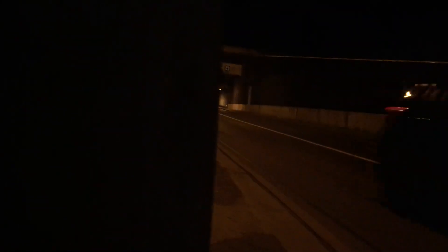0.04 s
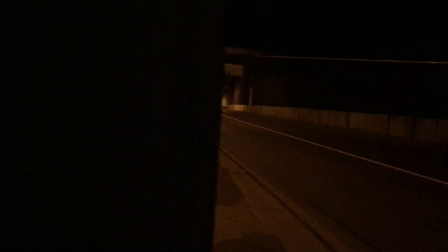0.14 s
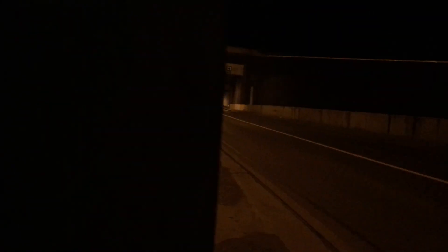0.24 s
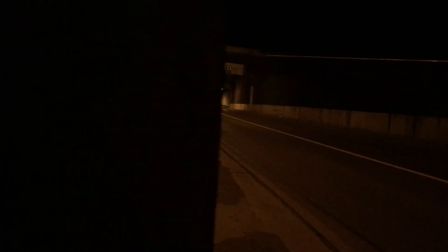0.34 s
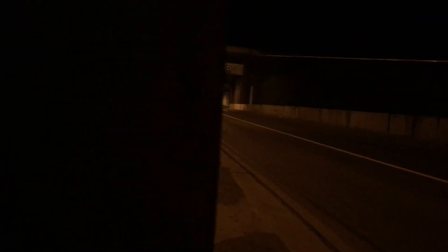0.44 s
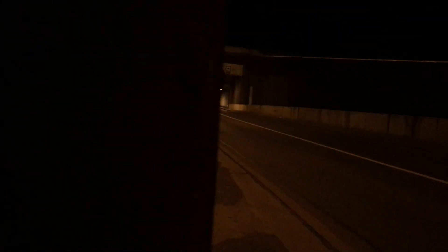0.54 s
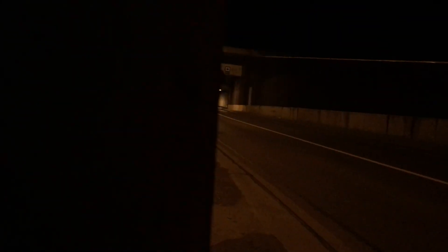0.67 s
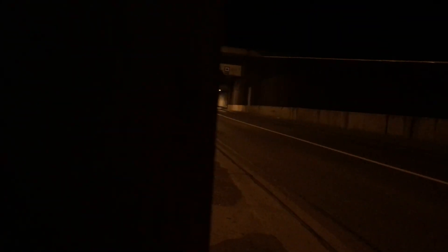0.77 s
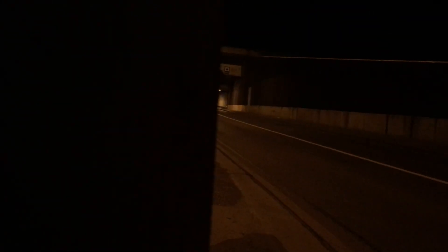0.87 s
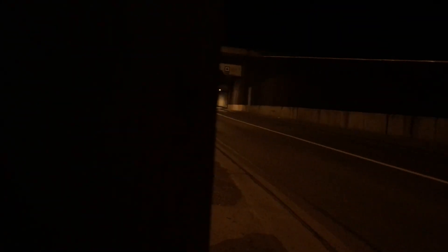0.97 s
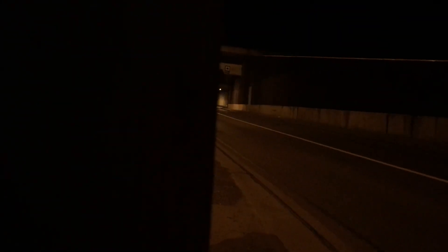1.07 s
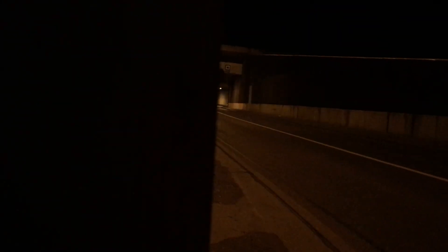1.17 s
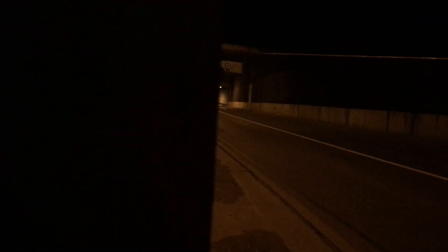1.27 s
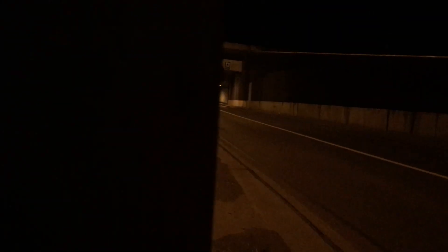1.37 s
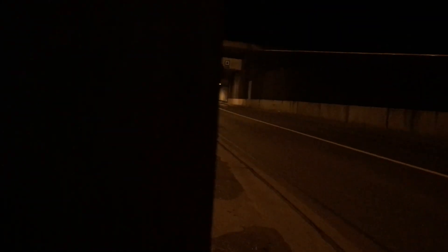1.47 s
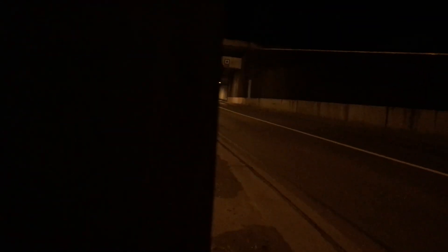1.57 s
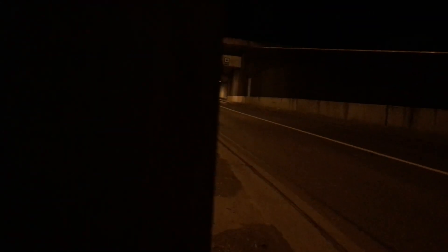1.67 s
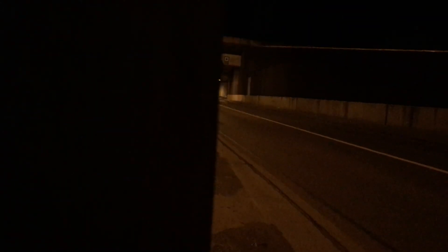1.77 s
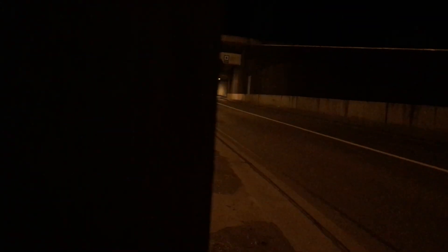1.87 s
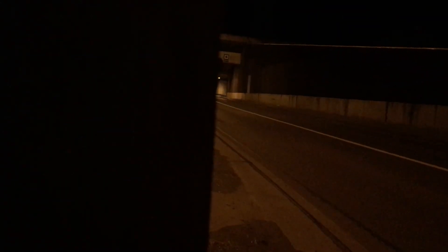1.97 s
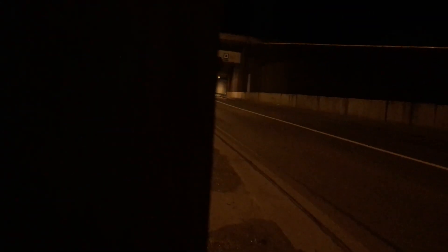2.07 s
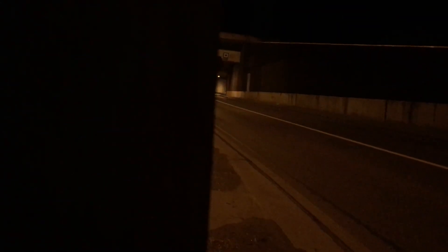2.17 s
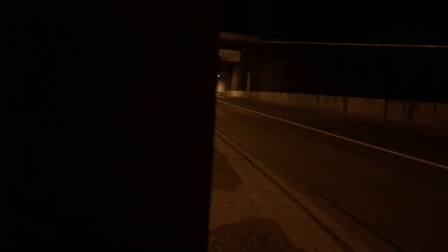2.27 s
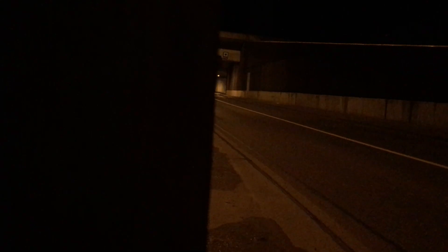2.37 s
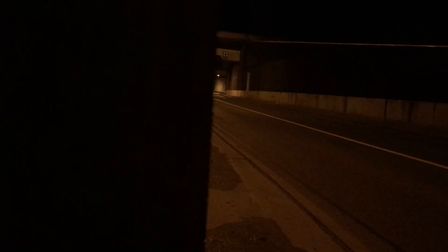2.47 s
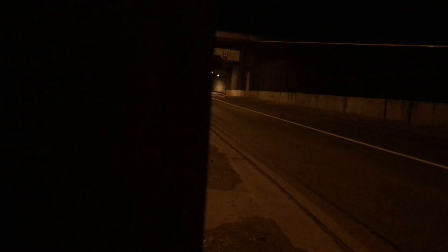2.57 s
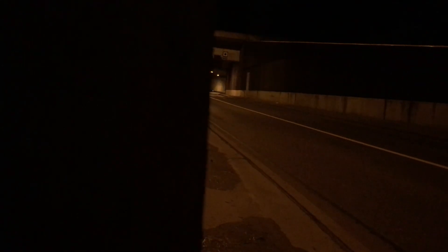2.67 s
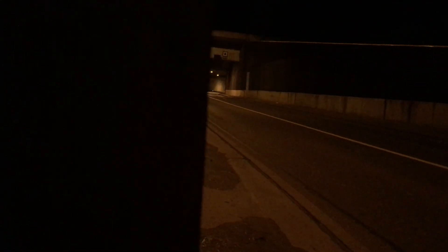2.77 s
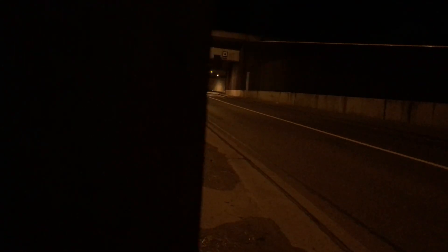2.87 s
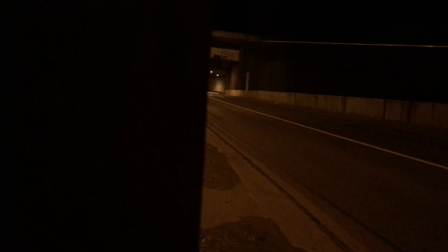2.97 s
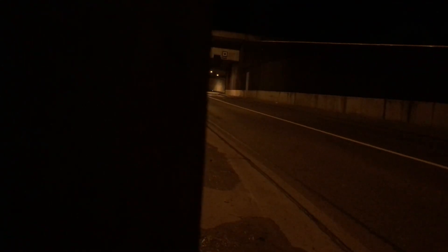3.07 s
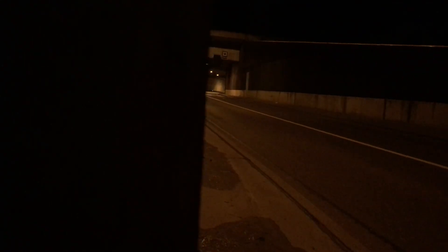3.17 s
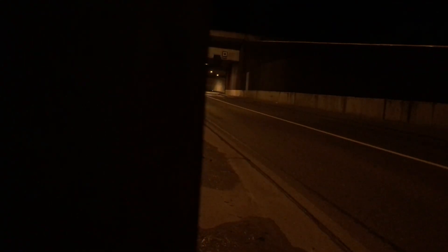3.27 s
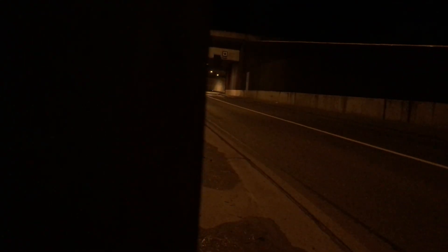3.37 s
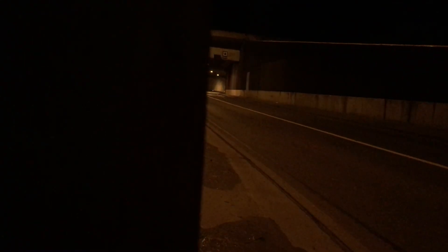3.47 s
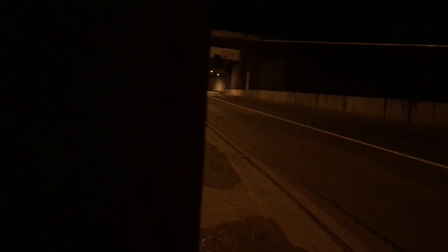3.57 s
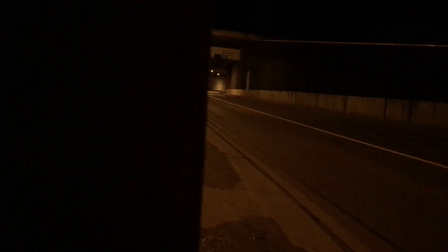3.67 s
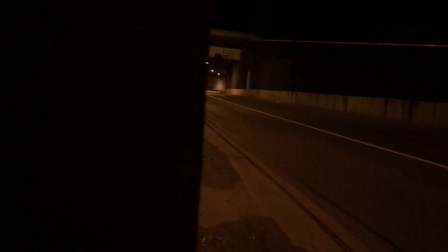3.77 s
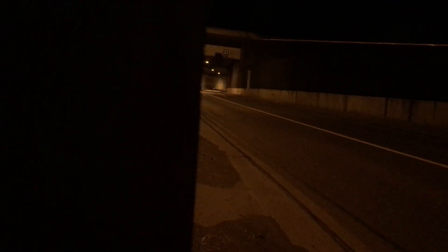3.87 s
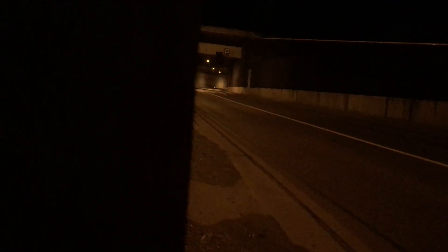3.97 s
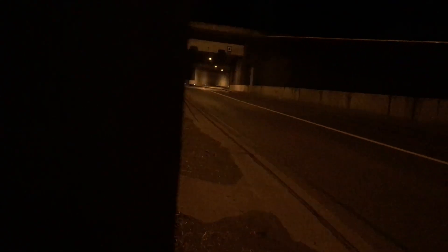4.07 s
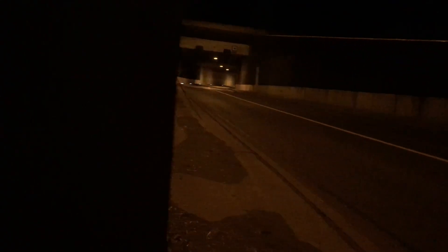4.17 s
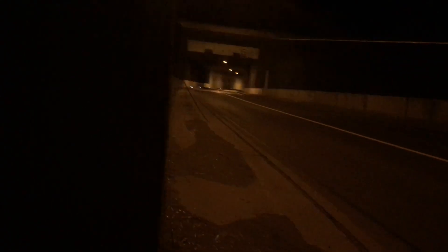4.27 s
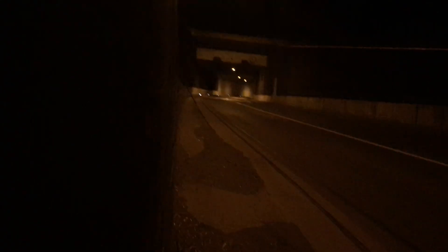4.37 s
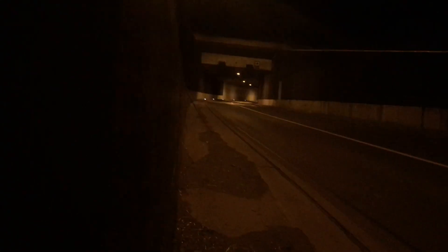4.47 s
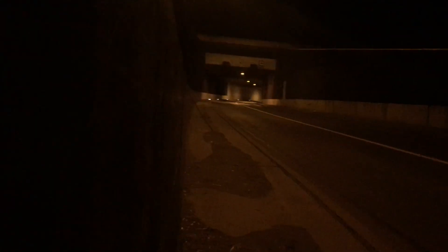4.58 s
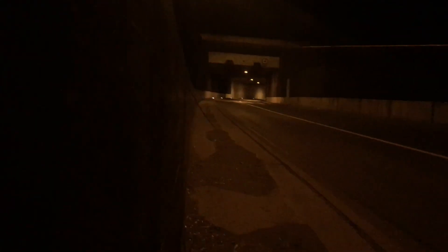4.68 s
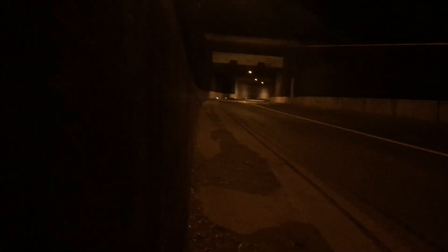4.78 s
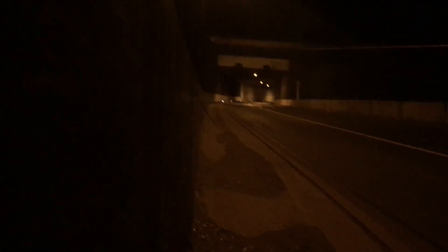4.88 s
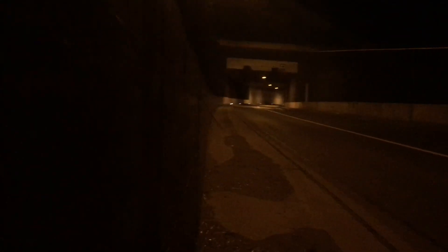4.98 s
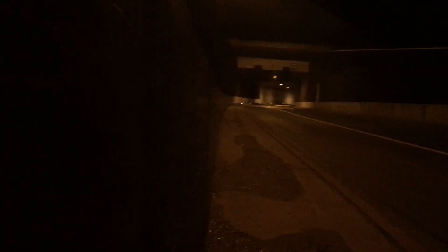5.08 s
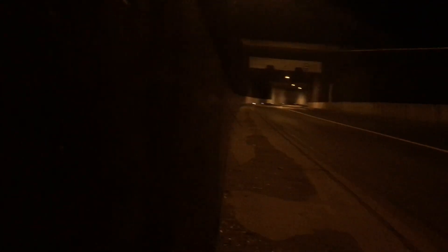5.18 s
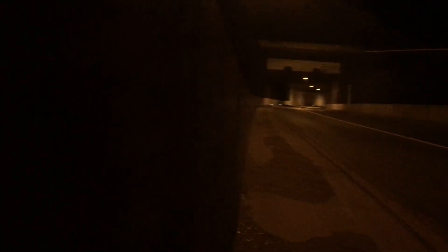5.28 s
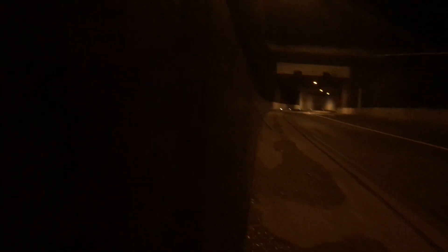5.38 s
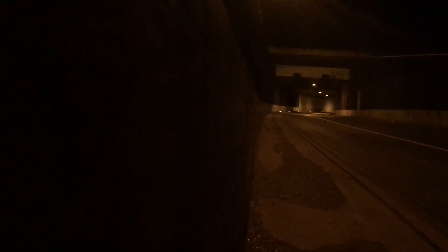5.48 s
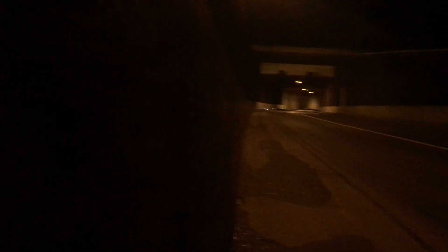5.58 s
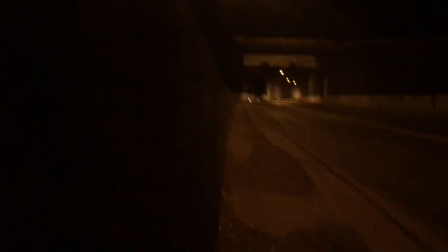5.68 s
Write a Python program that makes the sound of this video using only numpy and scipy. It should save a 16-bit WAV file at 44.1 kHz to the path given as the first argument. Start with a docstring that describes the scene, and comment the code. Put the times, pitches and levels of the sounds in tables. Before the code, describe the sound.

In a concrete road tunnel, a car sweeps past at arm's length right at the start with a bright tyre rush and booming low exhaust. The close noise cuts off quickly, leaving a dull roar and hiss shrinking down the tube, a pulsing engine note and a steady wavering rumble. Distant traffic slowly rises. Small ticks and cloth rustles touch the microphone near the end.

```python
"""Car passing in a road tunnel

A car sweeps past at arm's length in a concrete tunnel: tyres are filtered noise, the exhaust a swept sine.
Spreading dims the car as it leaves; the tunnel adds a dull tyre roar, hiss, echo and a low modal rumble.
Traffic noise rises behind it, grit ticks, and near the end cloth rustles on the microphone as random snaps.
"""
import sys
import numpy as np
from scipy import signal
from scipy.fft import rfft, irfft, next_fast_len
from scipy.io import wavfile
from scipy.ndimage import uniform_filter1d, map_coordinates

SR = 44100
rng = np.random.default_rng(int(sys.argv[2]) if len(sys.argv) > 2 else 0)


def inscribe(sig):
    """Save sig as 16-bit PCM at rate SR to the path in sys.argv[1].

    A 1-D sig is mono; a 2-D sig holds one channel per row.
    Samples are clipped to [-1, 1] before scaling.
    """
    pcm = np.round(np.clip(np.atleast_2d(sig).T, -1, 1) * 32767)
    wavfile.write(sys.argv[1], SR, pcm.astype(np.int16))


N = 253134

# the car's straight path: its speed, and the time it is level with the microphone
SPEED_M_PER_S, CLOSEST_S = 8.47, 0.07


def amp(db):
    """Logarithmic level: decibels to an amplitude ratio."""
    return 10 ** (np.asarray(db) / 20)


def unit(x):
    """Normalisation: x scaled to rms 1."""
    return x / np.sqrt(np.mean(x ** 2) + 1e-20)


def clock():
    """Sampling: the time of each sample in seconds."""
    return np.arange(N) / SR


def curves(rows):
    """Linear interpolation: one value per sample for each column after the time."""
    s, *columns = np.transpose(rows)
    return [np.interp(clock(), s, column) for column in columns]


def swell(centre_s, width_s):
    """Gaussian envelope: a bell that reaches 1 at its centre."""
    return np.exp(-((clock() - centre_s) / width_s) ** 2)


def wobble(rate):
    """Random modulation: a smooth curve through normal random knots, rate of them a second."""
    knots = rng.standard_normal(int(N * rate / SR) + 4)
    return map_coordinates(knots, [clock() * rate])


def filtered(x, response):
    """Linear filtering: the spectrum of x times a response of frequency."""
    size = next_fast_len(N + SR // 2)
    hz = np.fft.rfftfreq(size, 1 / SR)
    return irfft(rfft(x, size) * response(hz), size)[:N]


def coloured(x, spectrum):
    """Spectral shaping: x through an (f/Hz, level/dB) curve closing an octave beyond its ends, at rms 1."""
    f, db = np.transpose(spectrum)
    f = np.r_[f[0] / 2, f, f[-1] * 2]
    db = np.r_[-120, db, -120]
    return unit(filtered(x, lambda hz: amp(np.interp(np.log(hz + 1), np.log(f), db))))


def rush(spectrum, patchy_db):
    """Interference: coloured noise whose bands swell and sink at random, as when wall reflections interfere."""
    bands = signal.stft(rng.standard_normal(N), nperseg=2048)[2]
    field = uniform_filter1d(rng.standard_normal(bands.shape), size=3, axis=0)  # across frequency
    field = uniform_filter1d(field, size=8, axis=1)  # across time
    patchy = signal.istft(bands * amp(patchy_db * unit(field)), nperseg=2048)[1][:N]
    return coloured(patchy, spectrum)


def steadied(x, seconds):
    """Envelope levelling: evens out the slow swells of narrow noise and keeps its quick beats."""
    power = np.abs(uniform_filter1d(x ** 2, int(seconds * SR)))
    return x / np.sqrt(power + 1e-9)


def doppler(x, ratio):
    """Doppler effect: x read at a changing speed, so all its frequencies scale together."""
    return map_coordinates(x, [np.cumsum(ratio)], mode="mirror")


def spreading(gap_m, doubling_db):
    """Geometric spreading: dB relative to the closest point, falling with each doubling of distance."""
    along_m = SPEED_M_PER_S * (clock() - CLOSEST_S)
    return -doubling_db * np.log2(np.hypot(1, along_m / gap_m))


def near_tyres(level_db=-24, screened_s=0.29, screen_db_per_s=52, dull_db=-6.0, bright_db=4.0,
               doppler_share=.025, linger_db_per_s=11):
    """Spreading, Doppler shift and screening: direct tyre noise drops in pitch, then a pillar screens it."""
    # spectrum of the close tyres: f/Hz, relative level/dB
    near_spectrum = [(100, -31), (200, -4), (290, -5), (385, -10.5), (520, -15.5), (650, -0.5), (850, 1.5),
                     (1200, -5), (1500, -2.5), (2000, -14.5), (2450, -13.5), (3500, -19), (5000, -22),
                     (6500, -22.5), (10000, -29), (15800, -34.5)]
    t = clock()
    fade_db = spreading(gap_m=1.8, doubling_db=4.5) - screen_db_per_s * np.maximum(t - screened_s, 0)
    # the treble brightens as the rear wheels go by, then lingers between the walls
    lift_db = dull_db + bright_db * swell(centre_s=0.17, width_s=0.063)
    lift_db += linger_db_per_s * np.clip(t - screened_s, 0, .5)
    ratio = 1 - doppler_share * np.tanh((t - CLOSEST_S) / .15)
    tread = doppler(rush(near_spectrum, patchy_db=2.5), ratio)
    treble = filtered(tread, lambda hz: hz ** 2 / (hz ** 2 + 3000 ** 2))
    return amp(level_db + fade_db + 0.42 * wobble(31.6)) * (tread + (amp(lift_db) - 1) * treble)


def standing_wave(depth_db=5.0, deepest_s=1.5, fade_s=0.73, crest_s=0.47, crest_gap_s=0.3433):
    """Standing wave: swing in dB as the tailpipe crosses crests and nodes, deepest a little down the tube."""
    crests = np.cos(2 * np.pi * (clock() - crest_s) / crest_gap_s)
    return depth_db * swell(deepest_s, fade_s) * crests


def exhaust(t60=2.1, wet_db=-11):
    """Harmonic pulsation and reverberation: the firing note and weak overtones, smeared by an echo."""
    # the engine revs up, then eases off: t/s, firing f/Hz
    revs = [(0, 71), (.22, 79), (.44, 77), (.52, 72.38), (.95, 73.84), (1.5, 92), (3.4, 108), (3.9, 127),
            (4.3, 127), (4.72, 88), (5.74, 82.2)]
    # the note ahead of the standing wave, booming briefly as the revs drop: t/s, level/dB
    throttle = [(.07, -28.5), (.3, -21), (.48, -18.5), (.56, -24.5), (.84, -23.5), (1, -34), (1.2, -29.5),
                (1.5, -31), (2.2, -39.5), (3.4, -48), (4.4, -41.5), (4.52, -29), (4.64, -41.5), (5.3, -35),
                (5.74, -48)]
    firing_hz, = curves(revs)
    level_db, = curves(throttle)
    t = clock()
    phase = 2 * np.pi * np.cumsum(firing_hz * (1 + 0.00664 * wobble(14))) / SR
    note = np.sin(phase) + amp(-25.0) * np.sin(2 * phase) + amp(-24) * np.sin(3 * phase)
    note = amp(level_db + standing_wave() + 0.36 * wobble(11)) * note
    tail = rng.standard_normal(SR) * amp(-60 * t[:SR] / t60)  # cut off after one second
    down_the_tube = np.clip(t - .6, 0, 1)
    echo = signal.fftconvolve(note * down_the_tube, tail / np.linalg.norm(tail))[:N]
    # a faint tone at 7/4 of the firing rate sounds while the tailpipe is close
    close = swell(centre_s=.36, width_s=0.073)
    fractional_order = amp(-27.5) * close * np.sin(7 / 4 * phase)
    return np.sqrt(2) * (note + amp(wet_db) * echo + fractional_order)


def engine_bay(level_db=-34.7, loudest_s=0.21, rise_db_per_s=30, fall_db_per_s=31):
    """Proximity: a low mechanical rush from under the car stands out only while it is close."""
    # spectrum of the mechanical noise: f/Hz, relative level/dB
    bay_spectrum = [(150, -18), (220, -4.5), (290, 6.5), (345, -4.5), (385, 6.5), (420, -12), (456, 0.5),
                    (500, -26), (800, -14)]
    since_s = clock() - loudest_s
    pass_db = np.minimum(rise_db_per_s * since_s, -fall_db_per_s * since_s)
    return amp(level_db + pass_db) * rush(bay_spectrum, patchy_db=4.5)


def tunnel_roar(level_db=-29.5, wall_loss_db_per_s=0.54, pull_db=2.0, start_ratio=.935, speed_up_s=2.5):
    """Guided sound and wall loss: tyre noise sent back along the tube, its peak near 1 kHz rising with speed."""
    # spectrum of the roar at full speed: f/Hz, relative level/dB
    roar_spectrum = [(150, -42), (300, -20.5), (450, -16.5), (700, -14), (850, -6.5), (1000, -1), (1150, 2),
                     (1330, -1.5), (1600, -13), (2000, -13.5), (2400, -16), (3000, -41.5), (5000, -70)]
    t = clock()
    ratio = np.interp(t, [0, speed_up_s], [start_ratio, 1])
    roar = doppler(rush(roar_spectrum, patchy_db=1.67), ratio)
    fade_db = spreading(gap_m=3.85, doubling_db=4.0) - wall_loss_db_per_s * t
    pulling_db = pull_db * swell(centre_s=3.23, width_s=1.0)  # it holds up while the car pulls
    return amp(level_db + fade_db + pulling_db) * roar


def tunnel_hiss(level_db=-37.5, lift_db=2.0, dip_db=-1.5):
    """Air absorption: the tyres' hiss along the tube grows duller with distance; it lifts, then sinks."""
    # spectrum of the hiss before absorption: f/Hz, relative level/dB
    hiss_spectrum = [(900, -17), (1700, -1), (2300, 6), (2900, 0.5), (3500, 2.5), (4300, -4.5), (4900, -10),
                     (6700, -13.5), (7500, -20.5), (9500, -21.5), (10400, -31), (12000, -29),
                     (15800, -38.5)]
    hiss = rush(hiss_spectrum, patchy_db=1.5)
    # air soaks up the treble
    far_hiss = filtered(hiss, lambda hz: amp(-9 * np.clip(hz / 12000, 0, 1) ** 1.64))
    distance = np.clip(clock() / 11.7, 0, 1)  # share of the far sound
    drift_db = lift_db * swell(centre_s=1.9, width_s=0.57) + dip_db * swell(centre_s=3.07, width_s=0.49)
    gain = amp(level_db + spreading(gap_m=1.5, doubling_db=5) + drift_db)
    return gain * (distance * far_hiss + (1 - distance) * hiss)


def rumble(mode_hz=71.34, hum_db=-39, build_db_per_s=0.93, beat_at_s=2.78, beat_gap_s=0.566, beat_depth_db=3.5,
           boom_db=-34.5, boom_pass_db=7, drone_db=-40, drone_pass_db=9, drone_fade_db_per_s=0.8):
    """Modal resonance: a wavering, beating mode joins two bands of engine noise that swell at the pass."""
    # spectrum of the deep band: f/Hz, relative level/dB
    boom_spectrum = [(20, -41), (32, -34), (42, -9.5), (53, -10), (62, 1.5), (73, -3), (86, 0), (103, -4),
                     (125, -8), (160, -23.5), (300, -49.5)]
    # spectrum of the band above it: f/Hz, relative level/dB
    drone_spectrum = [(70, -22), (125, -1.5), (150, 1.5), (178, -0.5), (208, 2), (260, -2.5), (330, -7),
                      (420, -19.5), (550, -19.5), (1000, -24)]
    t = clock()
    beat_db = beat_depth_db * np.cos(2 * np.pi * (t - beat_at_s) / beat_gap_s)
    phase = 2 * np.pi * np.cumsum(mode_hz * (1 + 0.01986 * wobble(9))) / SR
    hum = amp(hum_db + build_db_per_s * t + beat_db + 0.57 * wobble(16)) * unit(np.sin(phase))
    boom = steadied(rush(boom_spectrum, patchy_db=3.5), seconds=0.24)
    drone = steadied(rush(drone_spectrum, patchy_db=2.0), seconds=0.45)
    boom_gain = amp(boom_db + boom_pass_db * swell(centre_s=.3, width_s=0.28))
    drone_gain = amp(drone_db + drone_pass_db * swell(centre_s=.15, width_s=0.31) - drone_fade_db_per_s * t)
    return hum + boom_gain * boom + drone_gain * drone


def upper_hum(mode_hz=148, level_db=-46):
    """Modal resonance: a higher mode of the tunnel sings faintly while the car pulls."""
    phase = 2 * np.pi * np.cumsum(mode_hz * (1 + 0.013 * wobble(9))) / SR
    return amp(level_db) * swell(centre_s=3.25, width_s=0.48) * unit(np.sin(phase))


def cloth(jerk_db=1.1, rise_db_per_s=124, fall_db_per_s=300):
    """Stick-slip friction: fibres catch and let go in clumps of tiny snaps over a soft hiss."""
    # strokes on the microphone, each building, holding and stopping: start t/s, end t/s, level/dB
    strokes = [(4.1, 4.4, -69), (4.6, 4.9, -76), (5.026, 5.31, -50.5), (5.4, 5.5, -66.5),
               (5.578, 5.74, -53)]
    # spectral shaping of the snaps and hiss: f/Hz, relative level/dB
    cloth_spectrum = [(300, -18), (1200, 14), (2200, 14), (3500, 6), (5000, 0), (6500, 1), (9000, -3),
                      (10400, -4.5), (12500, -4), (15800, -9.5)]
    t = clock()
    stroke_levels = []
    for start, end, db in strokes:
        build_db = rise_db_per_s * np.maximum(start - t, 0)
        stop_db = fall_db_per_s * np.maximum(t - end, 0)
        stroke_levels.append(db - build_db - stop_db)
    level_db = np.max(stroke_levels, axis=0)
    sizes = amp(4.5 * np.clip(rng.standard_normal(N), -2, 2))
    snags = (rng.random(N) < 1200 / SR) * rng.choice([-1, 1], N) * sizes  # about 1200 a second
    snaps = filtered(snags, lambda hz: hz / (hz + 1500))  # the snaps are brighter than the rub
    fibres = unit(snaps) + .7 * rng.standard_normal(N)
    clumps_db = 1.6 * wobble(160)
    return amp(level_db + clumps_db + jerk_db * wobble(45)) * coloured(fibres, cloth_spectrum)


def ticks(t60=0.0045):
    """Impact with exponential decay: grit and handling give short, bright, dry cracks of noise."""
    # cracks: t/s, peak level/dB ahead of the filter
    cracks = [(0.3586, -27), (1.203, -48.5), (4.224, -51), (4.32, -56), (4.3934, -48), (4.7656, -44),
              (4.9405, -47), (5.0305, -42.5), (5.2994, -42.5), (5.341, -43), (5.558, -42)]
    out, t = np.zeros(N + SR), np.arange(SR // 20) / SR
    for s, db in cracks:
        crack = rng.standard_normal(len(t)) * amp(-60 * t / t60)
        out[round(s * SR):][:len(t)] += amp(db) * crack / np.abs(crack).max()
    return filtered(out[:N], lambda hz: hz ** 2 / (hz ** 2 + 3500 ** 2) / np.hypot(1, (hz / 13000) ** 2))


def traffic(level_db=-48.0, rise_db_per_s=5, full_s=4.04):
    """Diffuse background: a broad, far road noise slowly rises behind the departing car, then holds."""
    # spectrum of the far road: f/Hz, relative level/dB
    traffic_spectrum = [(200, -44), (400, -9.5), (700, 0.5), (1100, -0.5), (1700, 1), (2300, -9),
                        (3200, -16.5), (5000, -27), (9000, -38.5)]
    rise_db = -rise_db_per_s * np.maximum(full_s - clock(), 0)
    return amp(level_db + rise_db) * rush(traffic_spectrum, patchy_db=3.5)


def scene():
    """Superposition: the car, the tunnel and the handling noise add at one microphone."""
    car = near_tyres() + engine_bay() + exhaust()
    tunnel = tunnel_roar() + tunnel_hiss() + traffic() + rumble() + upper_hum()
    return (car + tunnel + cloth() + ticks())[None]


def record(dry):
    """Self-noise and band limiting: a faint hiss is added and nothing is kept above the limit."""
    top_hz = 15780
    self_noise = amp(-80.5) * rng.standard_normal(N)
    return filtered(dry[0] + self_noise, lambda hz: hz < top_hz)[None]


dry = scene()
out = record(dry)
inscribe(out)
```